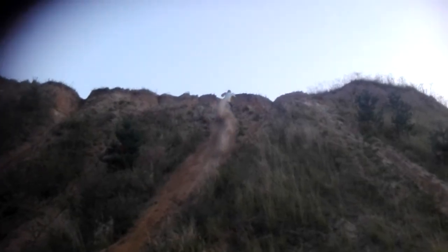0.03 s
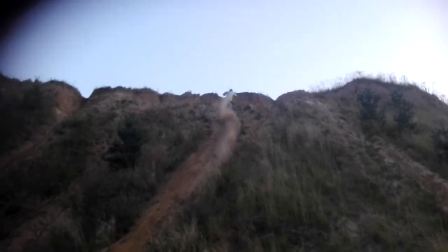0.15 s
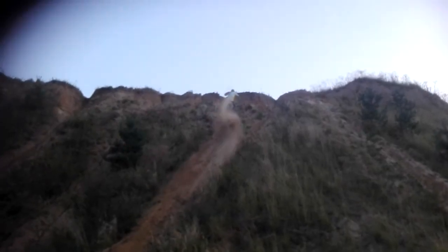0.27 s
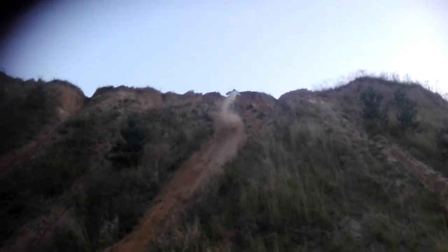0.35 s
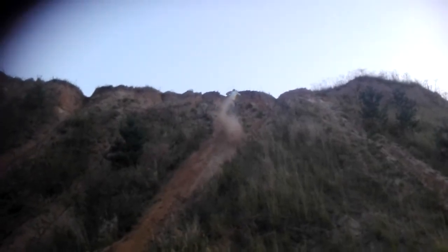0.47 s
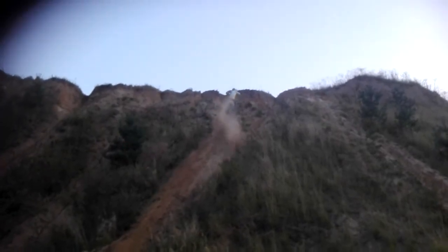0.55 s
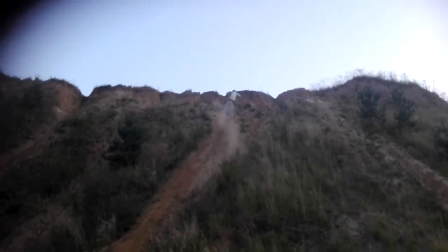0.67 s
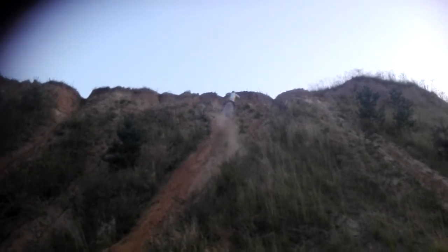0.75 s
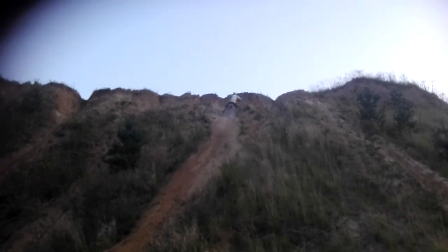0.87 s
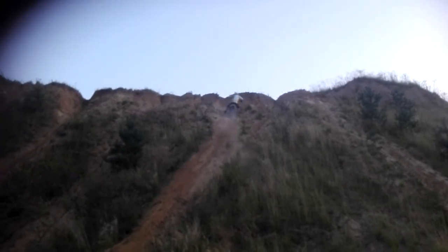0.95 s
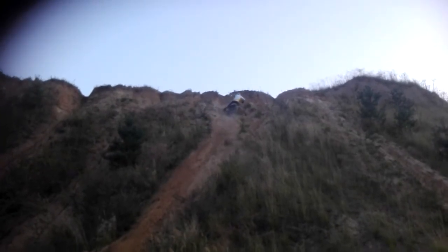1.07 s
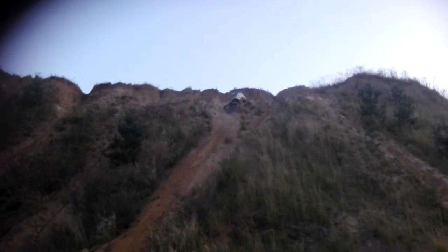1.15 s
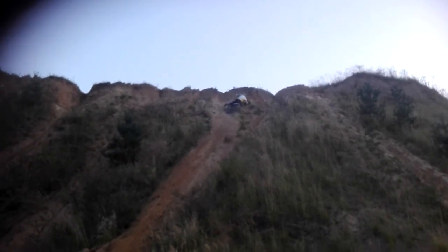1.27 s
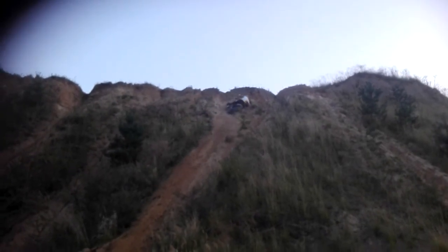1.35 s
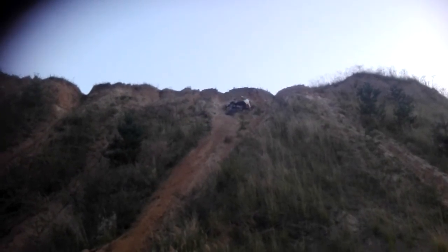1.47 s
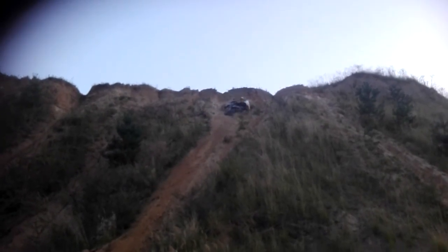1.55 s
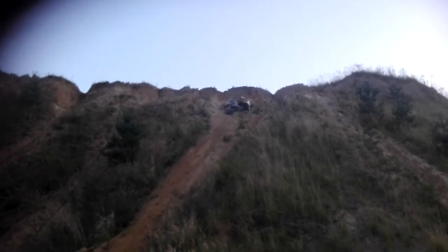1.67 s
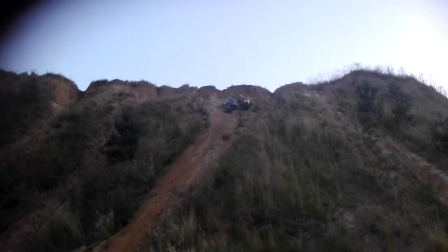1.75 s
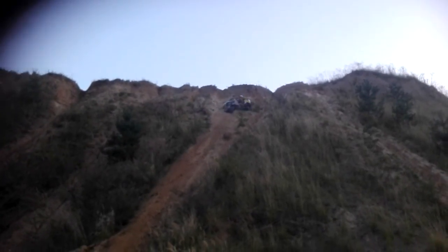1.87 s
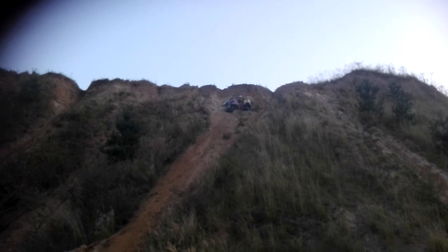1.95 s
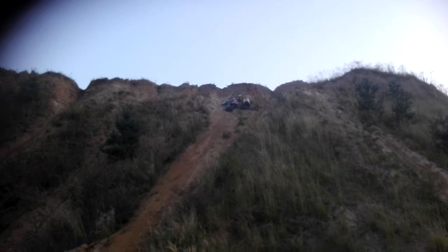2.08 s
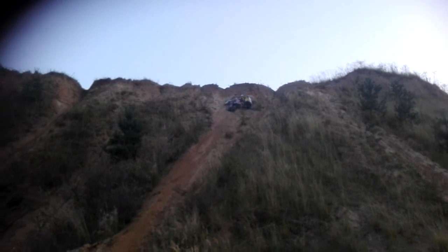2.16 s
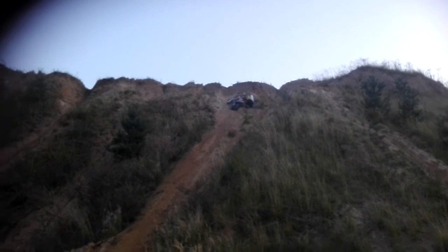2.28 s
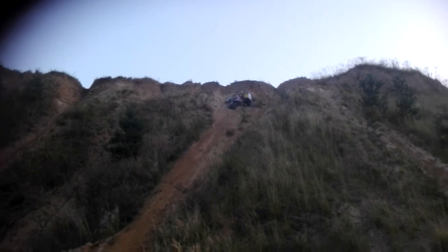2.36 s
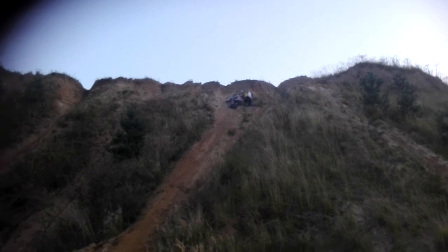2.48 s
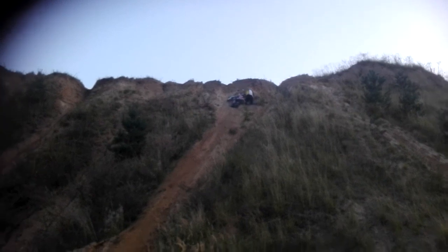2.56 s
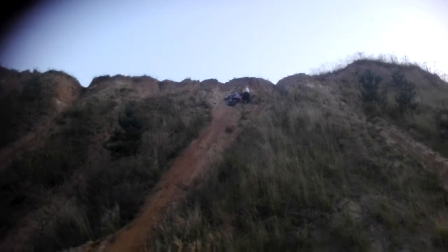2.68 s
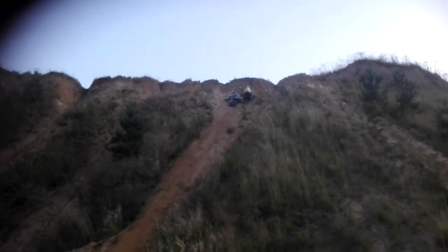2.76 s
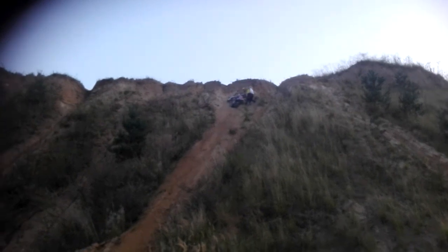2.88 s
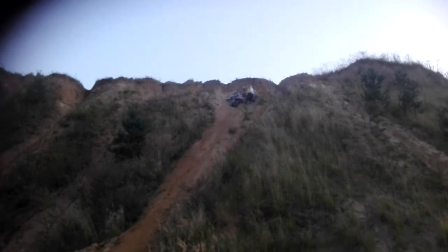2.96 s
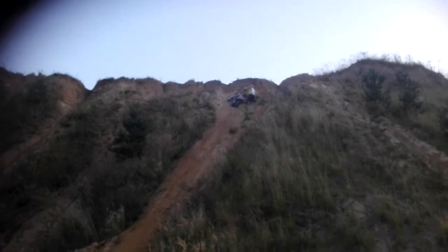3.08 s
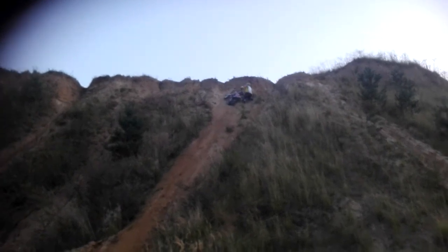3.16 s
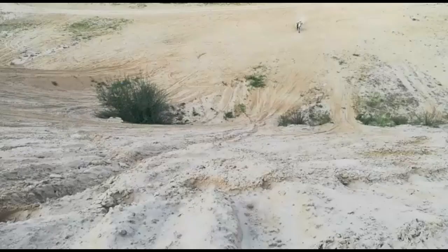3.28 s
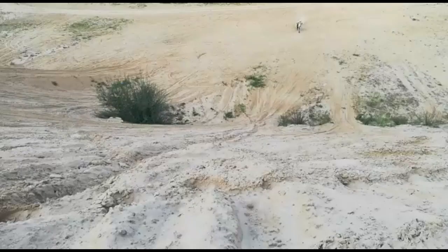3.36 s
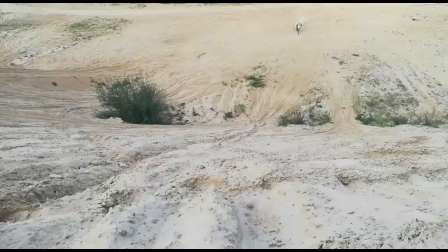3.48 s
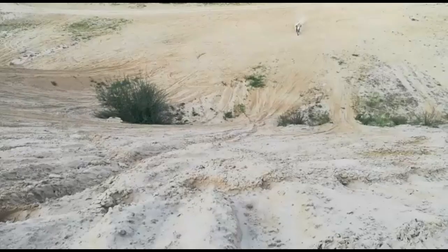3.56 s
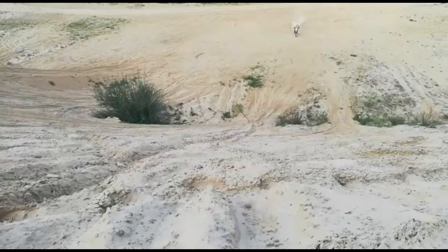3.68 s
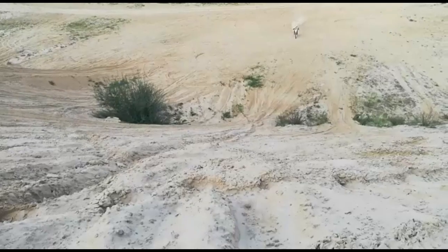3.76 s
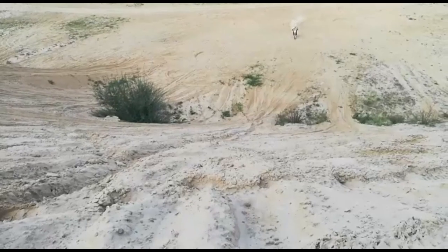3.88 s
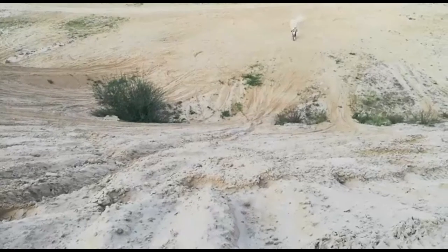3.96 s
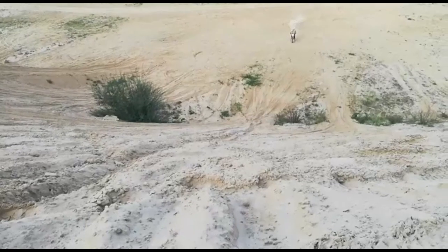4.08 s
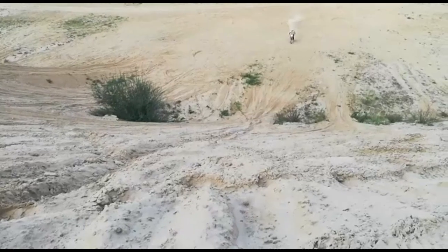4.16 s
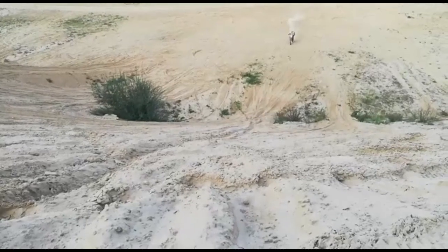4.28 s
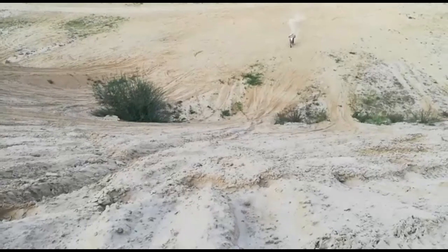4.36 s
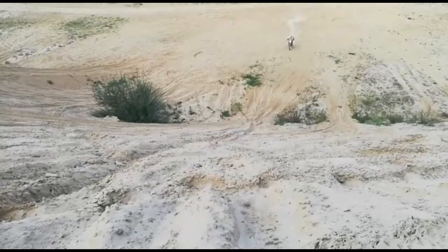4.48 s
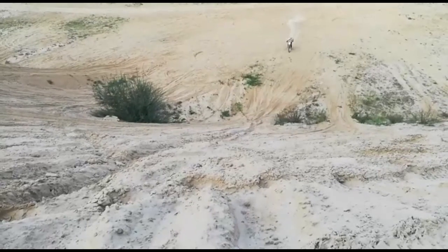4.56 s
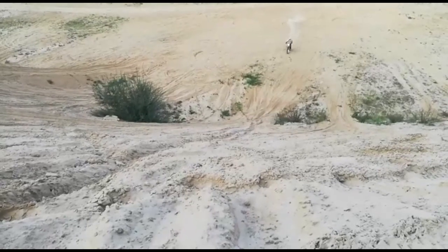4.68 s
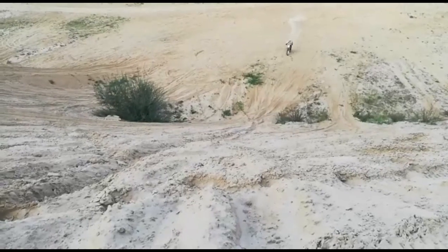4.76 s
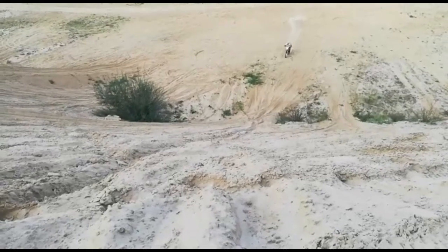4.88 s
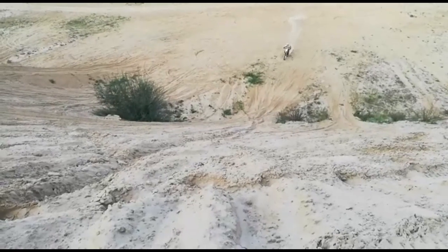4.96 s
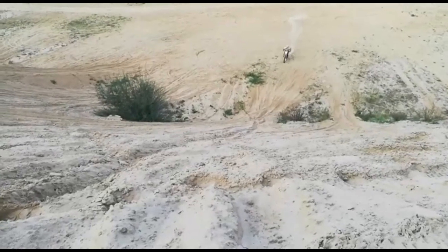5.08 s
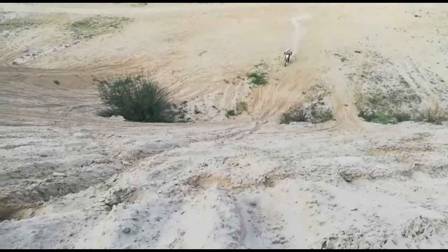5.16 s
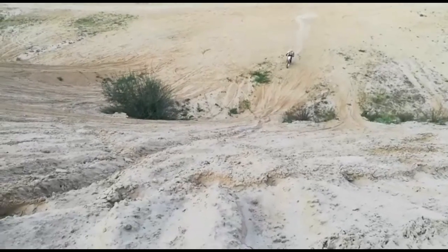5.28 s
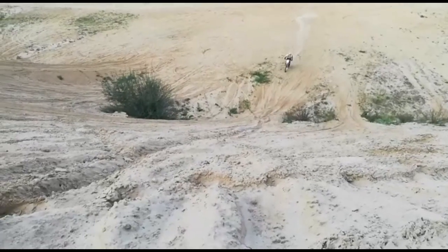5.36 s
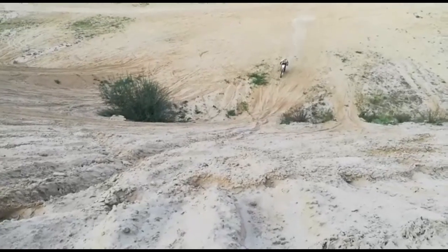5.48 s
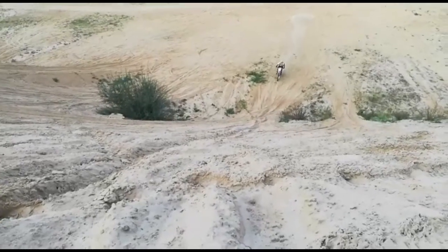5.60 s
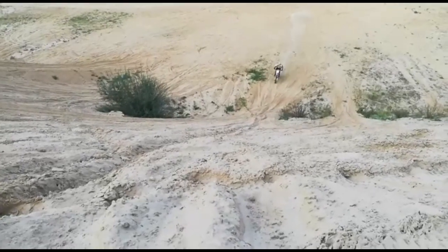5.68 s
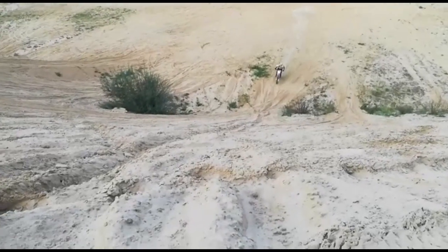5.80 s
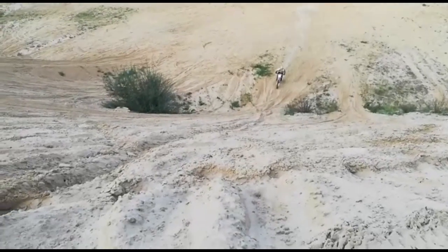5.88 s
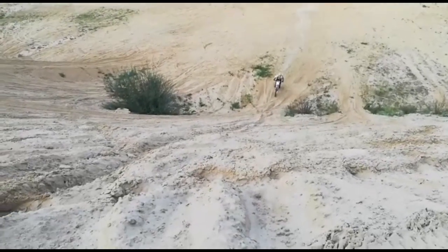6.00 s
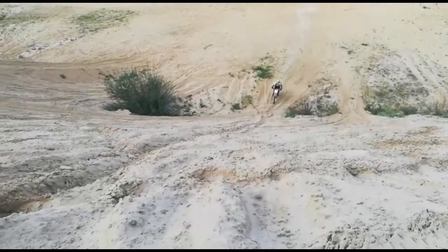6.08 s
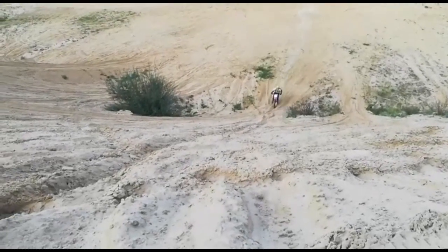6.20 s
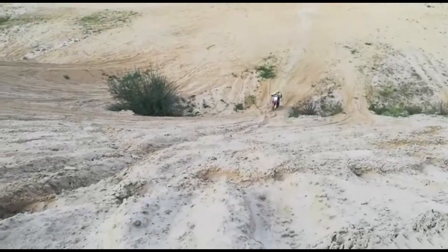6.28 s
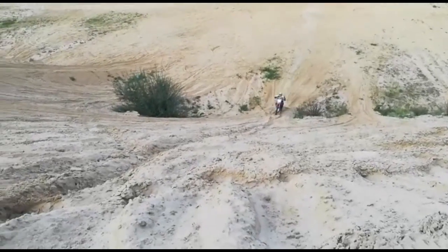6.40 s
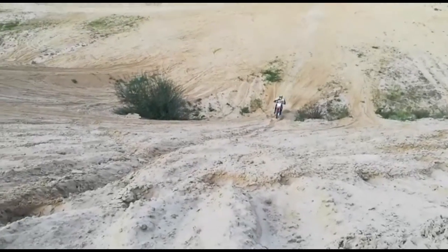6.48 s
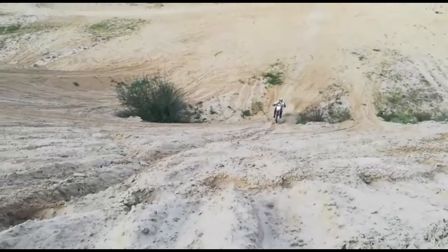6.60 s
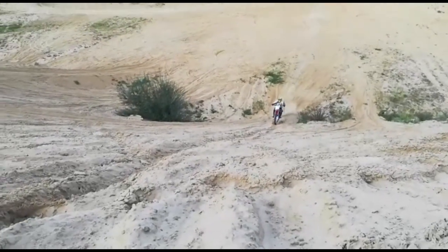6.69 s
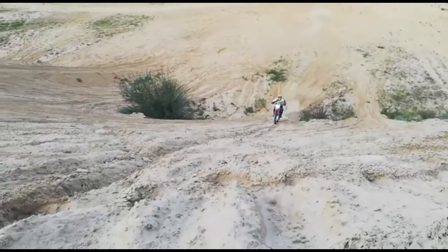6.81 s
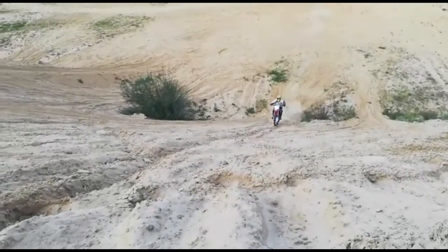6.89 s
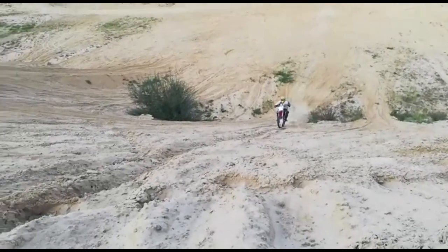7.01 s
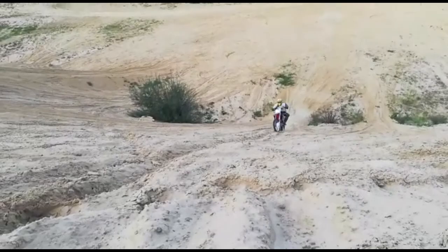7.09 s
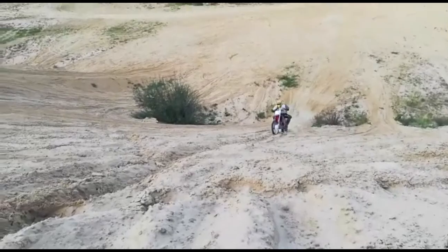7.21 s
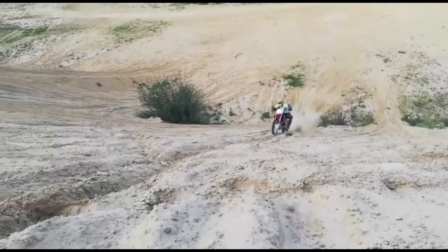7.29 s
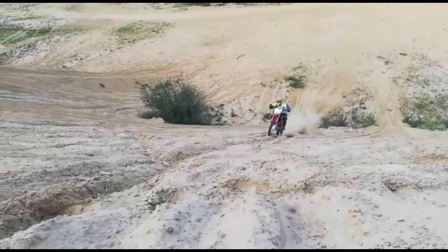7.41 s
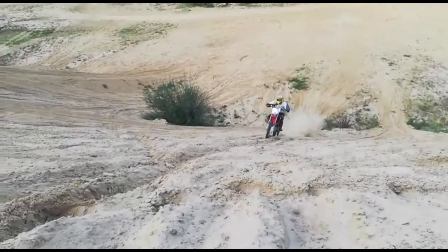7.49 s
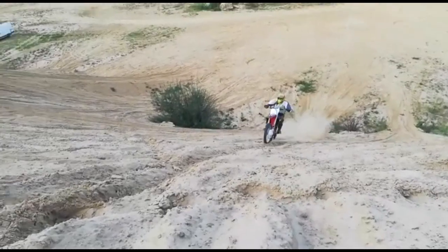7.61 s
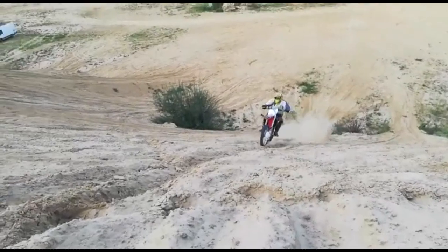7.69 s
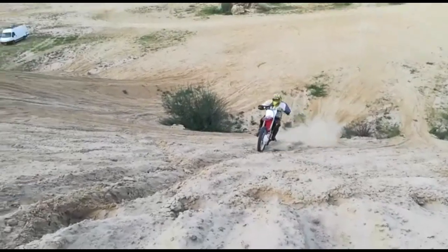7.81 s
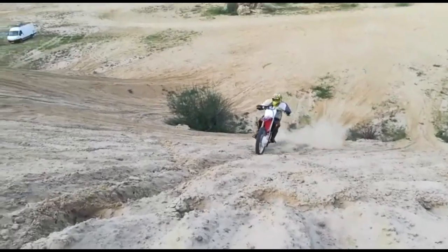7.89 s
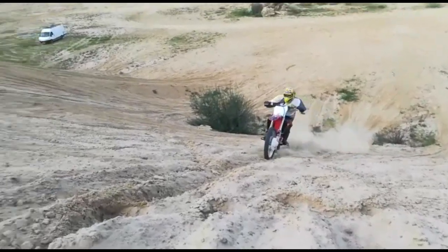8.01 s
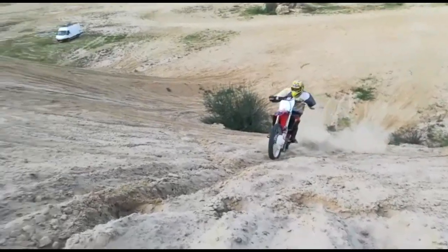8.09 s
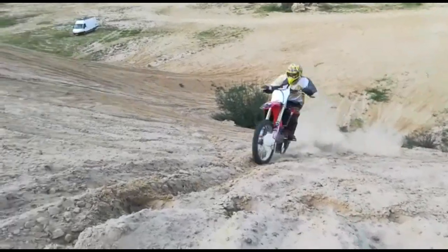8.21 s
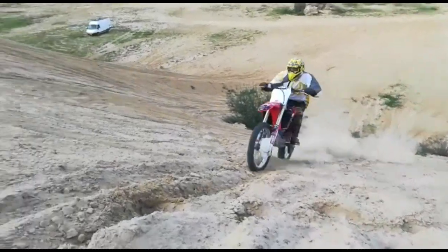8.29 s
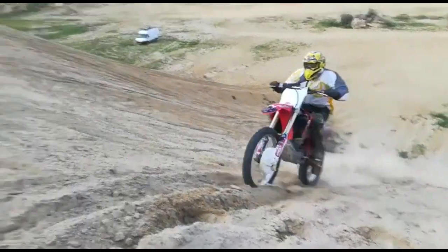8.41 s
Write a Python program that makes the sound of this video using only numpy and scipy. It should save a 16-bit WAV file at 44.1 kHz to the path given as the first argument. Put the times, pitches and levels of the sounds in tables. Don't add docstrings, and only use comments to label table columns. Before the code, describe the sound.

Far-off single-cylinder engine sags with small backfires, chugs and dies, then a second motocross bike surges up toward the microphone, raspy and loud.

```python
import sys
import numpy as np
from scipy import signal
from scipy.fft import rfft, irfft
from scipy.io import wavfile
from scipy.ndimage import uniform_filter1d

SR = 44100
rng = np.random.default_rng(int(sys.argv[2]) if len(sys.argv) > 2 else 0)


def inscribe(sig):
    pcm = np.round(np.clip(np.atleast_2d(sig).T, -1, 1) * 32767)
    wavfile.write(sys.argv[1], SR, pcm.astype(np.int16))


def linear_from_db(decibels):
    return 10 ** (np.asarray(decibels, float) / 20)


N = 372644
T = np.arange(N) / SR
CUT_S, START_S, FOOT_S, TURN_S = 3.1, 3.5705, 5.27, 5.95
FACE_S, NEAR_S, CLOSE_S = 6.24, 7.5, 7.92

# (frequency [Hz], level [dB per Hz])
AIR_COLOUR = [(18, -12), (30, 5), (65, 5.5), (217, -5.5), (350, -47), (461, -61), (1620, -42.5),
              (12000, -45), (15600, -79), (22000, -120)]

# (time [s], firings so far)
FIRING_COUNT = [(-.008, -1), (.072, 4), (.149, 8), (.236, 12), (.333, 16), (.438, 20), (.554, 24),
                (.683, 28), (.894, 34), (1.165, 41), (1.421, 47), (1.604, 51), (1.701, 53), (2.424, 67),
                (2.799, 74), (2.925, 76), (3.02, 77), (3.095, 78.9)]
# (time [s], loss of even firings, of odd ones if negative [dB])
LEAN_FIRINGS = [
    (0, 0),
    (.9, 0),
    (1.66, 17),
    (1.86, 8),
    (2.2, 31),
    (2.45, -5),
    (2.6, -1.5),
    (3.1, -2),
]
# (frequency [Hz], width [Hz], level [dB])
SILENCER = [(52, 18.4, 3), (85, 44, -2.5)]
TAIL_PIPE = [(151, 75, 0)]
HEADER_PIPE = [(197.6, 80, 13), (331.7, 53, 2.5)]
# (frequency [Hz], level [dB per Hz])
PULLING_RATTLE = [(350, -23), (600, -10.5), (659, -20), (734, -4.5), (818, -10.5), (1130, -6.5),
                  (2600, -15), (3230, -8.5), (4900, -14.5), (10900, -37.5), (13700, -27), (14400, -42),
                  (15000, -51)]
IDLING_RATTLE = [(350, -31), (600, -4), (672, -17), (771, -3.5), (1070, -12), (1180, -4), (1340, -7.5),
                 (1620, -3), (2950, -10), (4030, -0.5), (4570, -4.5), (10700, -35), (12000, -32),
                 (15600, -112), (22000, -120)]
# (time [s], level [dB], pitch [Hz])
BACKFIRES = [(0.089, -38, 1940), (0.109, -40, 1490), (0.128, -43, 1740), (0.148, -39, 996),
             (0.169, -45, 1400), (0.188, -35, 920), (0.21, -38, 950), (0.233, -32, 980),
             (0.279, -34.5, 800), (0.255, -28.5, 1950), (0.303, -40, 974), (0.328, -37.5, 1010),
             (0.354, -37.5, 1140), (0.3545, -38, 3800), (0.2555, -49, 3300), (0.409, -42, 1550),
             (0.552, -43, 1360), (0.616, -41, 1200), (0.648, -54, 926), (2.22, -57, 3930)]
# (time [s], level [dB])
FALLING_NOTE = [
    (0, -40.5),
    (.15, -38),
    (.33, -87),
    (.42, -53),
    (.5, -96),
]
# (at idle [dB], with revs [dB per octave], under load [dB], coasting [dB],
# dying [dB per s])
PART_LEVELS = [
    (-49, 3.5, -2, 0.5, -65),
    (-50.5, 3.1, 15.5, 2, -110),
    (-51.5, 4, 4, -26.5, -190),
    (-67.5, 10.5, -0.3, 1.6, -48),
]
LABOUR_S, SHUT_S, CATCH_S, IDLE_S, DIES_S = 0.24, 0.55, 1.5, 1.68, 2.84

# (time [s], firing rate [Hz], level [dB], throttle [0-1])
RIDE_PATH = [(3.58, 55.05, -35.5, 0.92), (3.78, 52.8, -33, 0.4), (3.96, 45.16, -34.5, 0.29),
             (4.06, 36.15, -39.5, 0.23), (4.345, 34.4, -37.5, 0.32), (4.41, 40.59, -31.5, 0.38),
             (4.51, 46.9, -31.5, 0.71), (4.75, 49.66, -33.5, 0.88), (5.36, 52, -33.5, 0.89),
             (5.75, 53.23, -32.5, 1), (5.89, 46.18, -34.5, 0.93), (6.01, 55.72, -22, 0.7),
             (6.18, 77.85, -23, 0.88), (6.34, 58.84, -23.5, 1), (6.44, 60.46, -20.5, 0.82),
             (6.79, 80.22, -22.5, 0.93), (7.67, 86.05, -19.5, 1), (8.45, 93.47, -17, 0.88)]
# (time [s], drop [Hz], fall [s], recovery [s])
TYRE_BITES = [
    (4.188, 1.8, 0.1213, .14),
    (5.0, 2.32, 0.19, .18),
    (7.33, 9.3, .25, 0.4),
    (7.97, 14.1, .28, .2),
    (8.18, 7.94, 0.19, .2),
]
# (time [s], half length [s], loss of order 2 [dB], gain of order 3 [dB])
GEAR_CHANGES = [
    (5.78, 0.03, 13, -15),
    (5.857, 0.093, 5, 29),
    (6.199, 0.035, 12, 11),
]
# (orders 1, 2, 3, 4, higher [dB])
VALLEY_ORDERS = [-7.5, -0.5, -16.5, -9, -16]
COAST_ORDERS = [-10, -4, 29, 16.5, -5]
FOOT_ORDERS = [-14, 0, -17, -19.5, -20]
RUN_UP_ORDERS = [2.5, 0.9, -0.5, -8, -5]
CLOSE_ORDERS = [1, 1.6, 3, 2.5, 1]
# (orders 1, 2, 3 [dB])
SLOPE_ORDERS = [-15, 0, -7]
# (firing rate [Hz], level [dB])
FOURTH_ORDER = [(60, -10), (70, -19), (75, -15.5), (81, -20.5), (93, -22)]
# (multiple of firing rate, level against rasp [dB])
GEAR_TEETH = [(13, -17), (17, -11), (22, -18), (25, -14), (30, -16)]
# (frequency [Hz], level [dB per Hz])
GAS_COLOURS = [
    [(180, -65), (300, -1), (404, -14.5), (600, 3), (784, 2), (1370, -2), (1570, -11.5), (1820, -2.5),
     (2200, -23.5), (2450, -7), (3200, -18), (4160, -47), (7040, -120)],
    [(180, -36), (300, -30), (396, -22), (517, -10.5), (732, -12), (840, -10), (1490, -3.5), (1650, -10),
     (1820, -5), (2810, -16), (3200, -4), (4160, -24), (7040, -120)],
    [(210, -30.5), (350, -5.5), (546, -16), (621, -8.5), (798, -8.5), (892, -2.5), (1220, -3.5),
     (1400, 2.5), (1690, 0.5), (2400, 4.5), (3200, -3.5), (4160, -37), (7040, -120)],
]
SAND_COLOURS = [
    [(1650, -1), (2800, -3), (2990, 3), (3420, 2), (3730, -9.5), (4040, -7.5), (7030, -2.5), (8980, -10.5),
     (9650, -16), (10300, -39), (11400, -29), (12400, -25), (15600, -47)],
    [(1650, -36), (2800, -4), (3050, -1), (3550, 1), (3820, -3), (4700, -7.5), (5390, -6.5), (7190, -14.5),
     (9790, -31), (10600, -38), (15600, -48)],
    [(1650, -45), (2800, 4.5), (3070, 1.5), (3790, 2), (4940, -5), (5630, -3), (6450, -2.5), (6980, -8),
     (7500, -7.5), (9110, -15.5), (11300, -34), (14600, -32.5), (15600, -35)],
]
# (valley, run-up, foot, slope [dB])
LOW_GAS_DB = [1, 3, -2.7, -9]
THROWN_SAND_DB = [1, 1, 0, -1]
# (time [s], length [s], pitch [Hz], level against rasp [dB])
HOWL_BANDS = [(6.003, 0.275, 1482, -4), (6.058, 0.193, 1147, -3.5), (6.498, 0.4, 2460, -10.5),
              (6.71, 0.39, 1350, -8.5), (7.252, .1, 2070, -3), (7.5, .32, 2470, -8.5),
              (7.32, 0.385, 1499, -12), (7.9, 0.17, 1458, -9.5), (8.105, 0.21, 2300, -5),
              (8.111, 1, 4112, -9), (8.26, 0.16, 1993, 1.5), (8.36, 0.066, 1344, -7)]
# (time [s], level [dB], pitch [Hz])
STONE_HITS = [
    (4.4624, -26, 1313),
    (4.5052, -35, 1300),
    (5.1487, -19, 5820),
]


def curves(table):
    s, *columns = np.transpose(table)
    return [np.interp(T, s, c) for c in columns]


def after(s, fade_s):
    return np.clip((T - s) / fade_s + .5, 0, 1)


def blend(weights, values):
    return sum(w * v for w, v in zip(weights, values))


def walk(rate):
    k = int(SR / rate)
    steps = np.repeat(rng.standard_normal(N // k + 1), k)
    return 1.302 * uniform_filter1d(uniform_filter1d(steps, k), k)[:N]


def even(x, seconds):
    return x / np.sqrt(uniform_filter1d(x ** 2, int(seconds * SR)) + 1e-12)


def colour(x, spectrum, lo_hz=0, hi_hz=SR):
    hz = np.maximum(np.arange(N // 2 + 1) * SR / N, 1)
    f, db = np.transpose(spectrum)
    edge = 1 / (1 + (hz / hi_hz) ** 8) / (1 + (lo_hz / hz) ** 8)
    gain = linear_from_db(np.interp(np.log(hz), np.log(f), db)) * np.sqrt(edge)
    cepstrum = irfft(np.log(gain), N)
    cepstrum[1:N // 2] *= 2
    cepstrum[N // 2 + 1:] = 0
    y = irfft(rfft(x) * np.exp(rfft(cepstrum)), N)
    return y / np.sqrt(np.mean(y ** 2))


def ring(x, modes, echo_s=0., echo=0.):
    y = 0
    for k, (hz, width, db) in enumerate(modes):
        band = signal.iirpeak(hz, hz / width, SR)
        twice = signal.lfilter(*band, signal.lfilter(*band, x))
        y = y + (-1) ** k * linear_from_db(db) * twice
    return y + echo * np.roll(y, int(echo_s * SR))


def cracks(events, decay_s, width):
    out, t = np.zeros(N), np.arange(2048) / SR
    for s, db, hz in events:
        burst = rng.standard_normal(len(t)) * np.exp(-t / decay_s)
        band = signal.iirpeak(hz, 1 / width, SR)
        y = signal.lfilter(*band, signal.lfilter(*band, burst))
        start = int(s * SR)
        out[start:start + len(t)] += linear_from_db(db) * y / np.abs(y).max()
    return out


def hill_air():
    level = linear_from_db(-55.5 + 2 * walk(2.5))
    return colour(rng.standard_normal(N), AIR_COLOUR) * level * (1 - after(CUT_S - .15, 0.37))


def wind():
    level = linear_from_db(-48 + 2.5 * walk(3))
    return even(ring(rng.standard_normal(N), [(38, 145, 0)]), 2.2) * level


def idle_levels(turns):
    rate_hz = uniform_filter1d(np.gradient(turns), 4000) * SR
    octaves = np.log2(np.maximum(rate_hz, 1) / 19.9)
    load = after(LABOUR_S / 2, LABOUR_S) - 0.36 * after(0.358, 0.052) - 0.7 * after(SHUT_S, 0.84)
    coast = after(SHUT_S, 0.29) - after(CATCH_S, 0.04)
    causes = (1, octaves, load, coast, np.maximum(T - DIES_S, 0))
    thump, *rest = [blend(causes, part) for part in PART_LEVELS]
    kick = after(2.84, .03) - after(2.993, .03)
    return [thump + 7 * kick, *rest]


def firing_pulses(turns):
    at = np.flatnonzero(np.diff(np.floor(turns)) > 0)
    sign = (-1.) ** np.floor(turns[at + 1])
    chance = rng.standard_normal((len(at), 2)).T
    loss_db = np.maximum(sign * curves(LEAN_FIRINGS)[0][at], 0)
    burn = linear_from_db(-loss_db + 1.5 * chance[0])
    fires, strokes = np.zeros(N), np.zeros(N)
    fires[at - 300] = burn
    strokes[at - 300] = burn ** .4 * linear_from_db(1.5 * chance[1])
    return fires, strokes


def distant_pipes(fires, strokes, thump_db, boom_db, bark_db):
    soft = signal.butter(6, 400, fs=SR, output="sos")
    pipes = ((strokes, SILENCER, thump_db, .05), (strokes, TAIL_PIPE, boom_db, .4),
             (fires, HEADER_PIPE, bark_db, .8))
    exhaust = 0
    for pulses, modes, db, echo in pipes:
        y = ring(signal.sosfilt(soft, pulses), modes, echo_s=0.01385, echo=echo * after(0.4, 0.49))
        exhaust = exhaust + even(y, 0.25) * linear_from_db(db)
    return signal.lfilter(*signal.iirnotch(286, 5.0, SR), exhaust)


def frame_rattle(fires, rattle_db):
    shake = signal.lfilter([1], [1, -np.exp(-1 / (0.039 * SR))], fires)
    shake = 0.3 + uniform_filter1d(shake, 200)
    noise = even(shake * rng.standard_normal(N), 0.092)
    idle = after(IDLE_S, 0.041)
    treble_db = 2 - 4 * after(IDLE_S, 0.091)
    rattle = 0
    for lo, hi, db in ((0, 5160, rattle_db), (2990, SR, treble_db + rattle_db)):
        pulling = (1 - idle) * colour(noise, PULLING_RATTLE, lo, hi)
        idling = idle * colour(noise, IDLING_RATTLE, lo, hi)
        rattle = rattle + linear_from_db(db) * (pulling + idling)
    return rattle


def stalling_bike():
    turns = uniform_filter1d(curves(FIRING_COUNT)[0] - 62 * T, 2000) + 62 * T
    thump_db, boom_db, bark_db, rattle_db = idle_levels(turns)
    fires, strokes = firing_pulses(turns)
    bike = distant_pipes(fires, strokes, thump_db, boom_db, bark_db)
    bike += linear_from_db(curves(FALLING_NOTE)[0]) * np.sqrt(2) * np.cos(2 * np.pi * 3 * turns)
    bike += frame_rattle(fires, rattle_db)
    return bike + cracks(BACKFIRES, decay_s=0.0014, width=1.5)


def ride():
    hz, db, throttle = curves(RIDE_PATH)
    throttle = np.clip(throttle, 0, 1)
    drag = sum(np.interp(T, [s - fall, s, s + back], [0, drop, 0]) for s, drop, fall, back in TYRE_BITES)
    hz, db = hz - drag, db + 0.0968 * drag
    run, turn, face = after(FOOT_S, 0.18), after(TURN_S, .1), after(FACE_S, 0.058)
    coast = np.clip((.35 - throttle) / 0.2, 0, 1)

    high_db = -37.5 + 17 * after(NEAR_S, 0.24)
    ahead = [*SLOPE_ORDERS, np.interp(hz, *np.transpose(FOURTH_ORDER)), high_db]
    weights = (1 - turn, coast, turn - face, face, run - turn, after(CLOSE_S, 0.29))
    orders = [db + blend(weights, values) for values in
              zip(VALLEY_ORDERS, COAST_ORDERS, FOOT_ORDERS, ahead, RUN_UP_ORDERS, CLOSE_ORDERS)]
    for s, half, loss_db, gain_db in GEAR_CHANGES:
        cut = np.clip(1 - np.abs(T - s) / half, 0, 1)
        orders[1] = orders[1] - loss_db * cut
        orders[2] = orders[2] + gain_db * cut

    place = (1 - run, run - turn, turn - face, face)
    rasp_db = db - 8 - 13 * (1 - throttle) + 1.12 * np.maximum(T - FACE_S, 0)
    low_db = blend(place, LOW_GAS_DB) - 7 * coast + 4 * after(CLOSE_S - .1, 0.15)
    spin = after(6.645, 0.4) - after(7.355, 0.083)
    sand_db = blend(place, THROWN_SAND_DB) + 3 * coast + 3.5 * spin + 5 * after(8.23, 0.305)
    sharp = (1 - .85 * coast) * (.3 + .25 * after(6.3, .8) + .08 * after(7.25, .15))
    return hz, orders, rasp_db, low_db, sand_db, sharp


def gear_whine(phase, rasp_db):
    whine = sum(linear_from_db(rasp_db + db + 4 * walk(6)) * np.cos(k * phase + .3 * walk(30)) for k, db in GEAR_TEETH)
    return after(TURN_S + .7, .4) * whine


def firing_crack(fires):
    casing = .08 * rng.standard_normal(600) * np.exp(-np.arange(600) / (.004 * SR))
    casing[0] = 1
    spread = np.exp(1j * np.angle(rfft(casing, N)))
    crack = even(irfft(rfft(fires) * spread, N), 0.099)
    lag = SR * (.0021 + .0003 * walk(2.5))
    bounce = np.interp(np.arange(N) - lag, np.arange(N), crack)
    return even(crack + .6 * bounce, .06)


def gas_and_sand(crack, puff, rasp_db, low_db, sand_db, sharp):
    grains = linear_from_db(1.4 * rng.exponential(size=N))
    place = (1 - after(FOOT_S, 0.12), after(FOOT_S, 0.13) - after(TURN_S, 0.59), after(TURN_S, 0.46))
    layers = ((0, 1100, low_db, puff, GAS_COLOURS, np.minimum(1.5 * sharp, .72)),
              (1100, 3000, 0, puff, GAS_COLOURS, sharp),
              (3000, SR, sand_db, puff ** .6 * grains, SAND_COLOURS, .3 * sharp))
    rasp = 0
    for lo, hi, db, rough, colours, share in layers:
        noise = even(rough * rng.standard_normal(N), 0.13) * linear_from_db(0.72 * walk(12))
        blow = np.sqrt(1 - share) * noise + np.sqrt(share) * crack
        coloured = sum(here * colour(blow, s, lo, hi) for here, s in zip(place, colours))
        rasp = rasp + linear_from_db(rasp_db + db) * coloured
    dip = signal.lfilter(*signal.iirpeak(2870, 2870 / 580, SR), rasp)
    return rasp - .75 * dip * (after(FOOT_S, .2) - .5 * after(7.9, .8))


def howls(blow):
    out = 0
    for s, length, hz, db in HOWL_BANDS:
        swell = after(s, 0.017) - after(s + length, 0.02)
        out = out + linear_from_db(db) * even(ring(blow, [(hz, 150., 0)]), 0.29) * swell
    return out


def bare_snaps(fires):
    aim = after(7.28, .08) - after(7.53, .12)
    return linear_from_db(-4.5) * aim * even(ring(fires, [(2400, 1500., 0)]), .06)


def exhaust_orders(phase, order_db, high_db):
    low = sum(np.sqrt(2) * linear_from_db(db + 1.3 * walk(30)) * np.cos(k * phase + 0.2 * k * k)
              for k, db in enumerate(order_db, 1))
    high = sum(linear_from_db(high_db - 4.2 * (k - 5) + 3 * walk(8)) * np.cos(k * phase + .15 * k * k)
               for k in range(5, 11))
    return low + high


def climbing_bike():
    hz, (*order_db, high_db), rasp_db, low_db, sand_db, sharp = ride()
    phase = 2 * np.pi * np.cumsum(hz * (1 + 0.0059 * walk(25))) / SR
    fires = np.diff(np.floor((phase + 1.2) / (2 * np.pi)), prepend=0) * linear_from_db(0.4 * walk(60))
    crack = firing_crack(fires)
    puff = 1.8 + np.exp(0.5 * (np.cos(phase + 3.4) - 1)) * linear_from_db(5.8 * walk(45))
    blow = .9 * crack + .4 * even(puff * rng.standard_normal(N), .05)

    bike = exhaust_orders(phase, order_db, high_db) + gear_whine(phase, rasp_db)
    bike += gas_and_sand(crack, puff, rasp_db, low_db, sand_db, sharp)
    bike += linear_from_db(rasp_db) * (howls(blow) + bare_snaps(fires))
    return bike + cracks(STONE_HITS, decay_s=0.0008, width=0.55)


def scene():
    first = (stalling_bike() + hill_air()) * (T < CUT_S)
    second = (climbing_bike() + wind()) * (T > START_S)
    return (first + second)[None]


def low_pass(x):
    return signal.sosfilt(signal.butter(12, 15780, fs=SR, output="sos"), x)


def record(dry):
    settle = -.075 * np.exp(-np.maximum(T - START_S, 0) / 0.068) * after(START_S, 0.00028)
    mix = np.tanh(1.183 * (dry + settle)) / 1.049
    return low_pass(mix)


dry = scene()
out = record(dry)
inscribe(out)
```